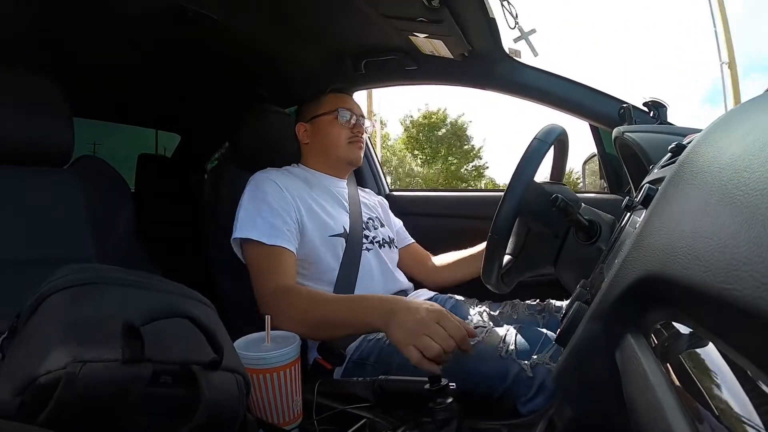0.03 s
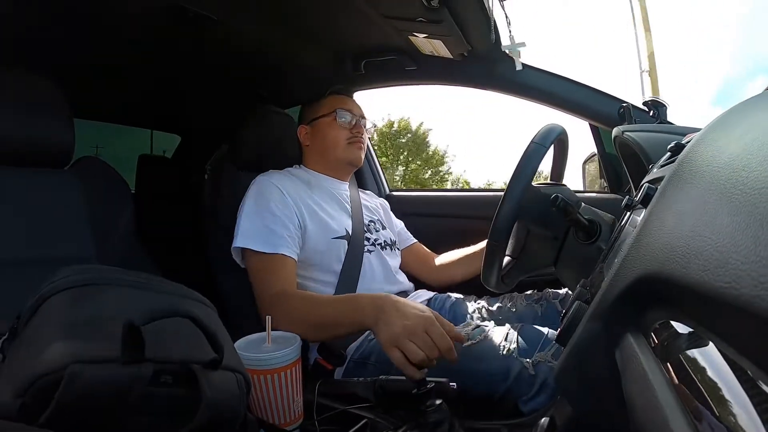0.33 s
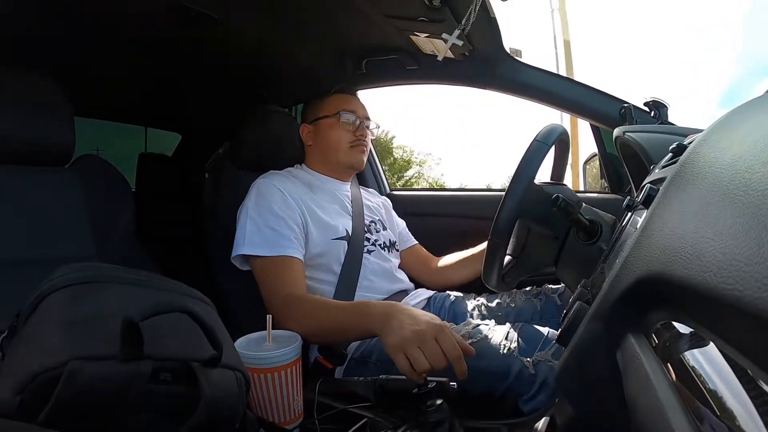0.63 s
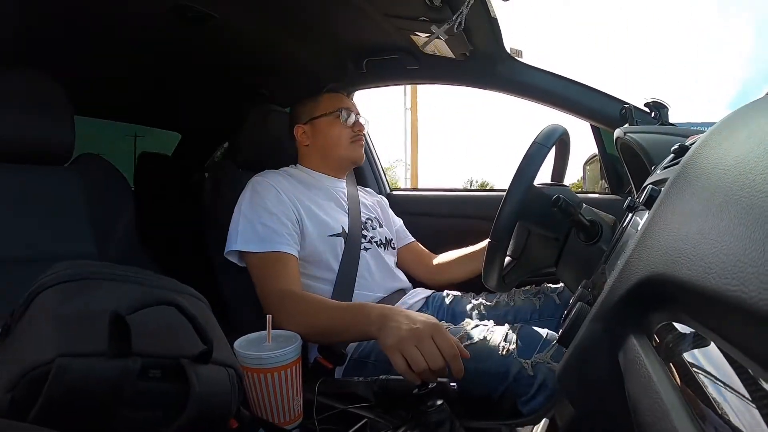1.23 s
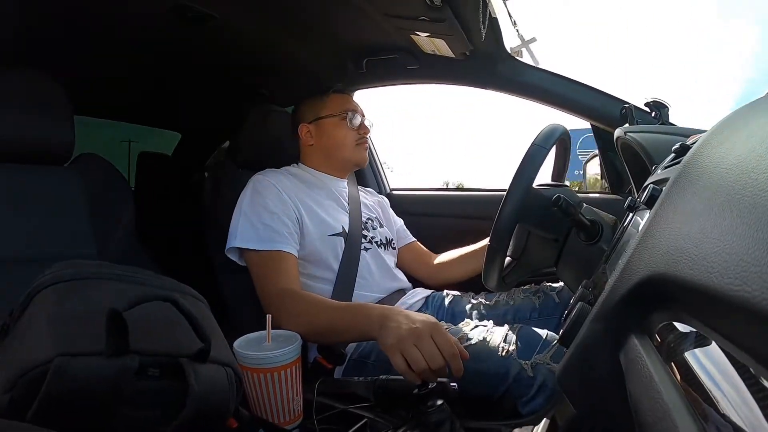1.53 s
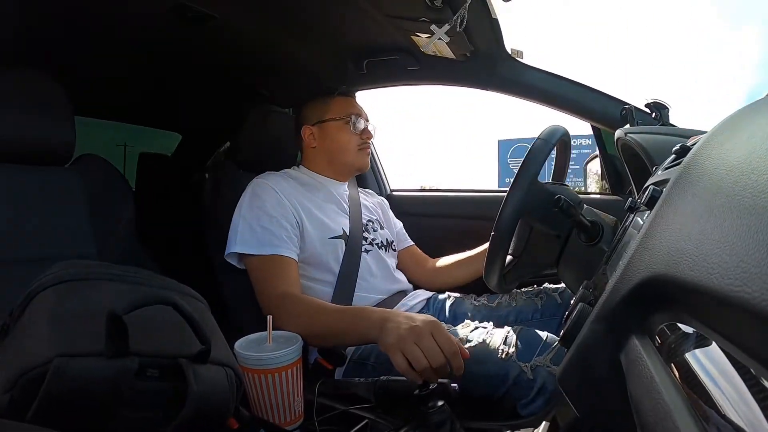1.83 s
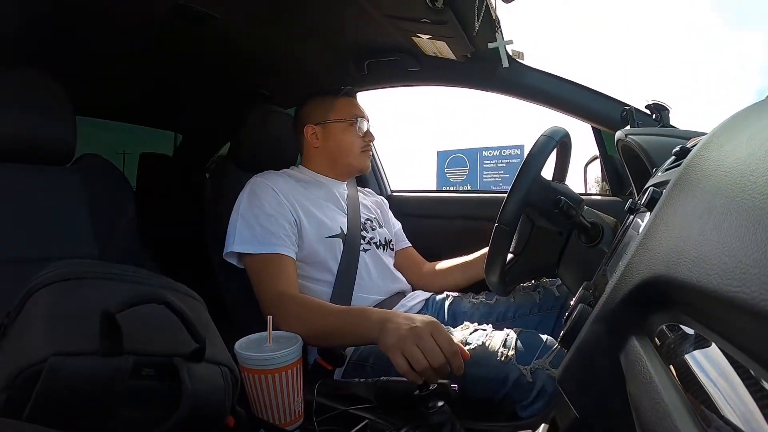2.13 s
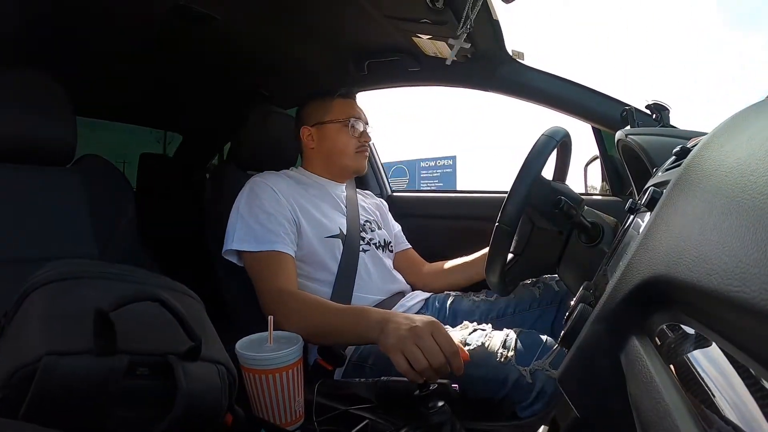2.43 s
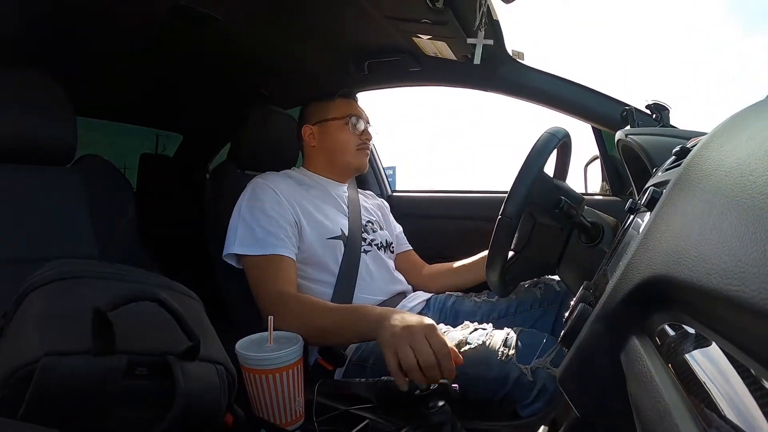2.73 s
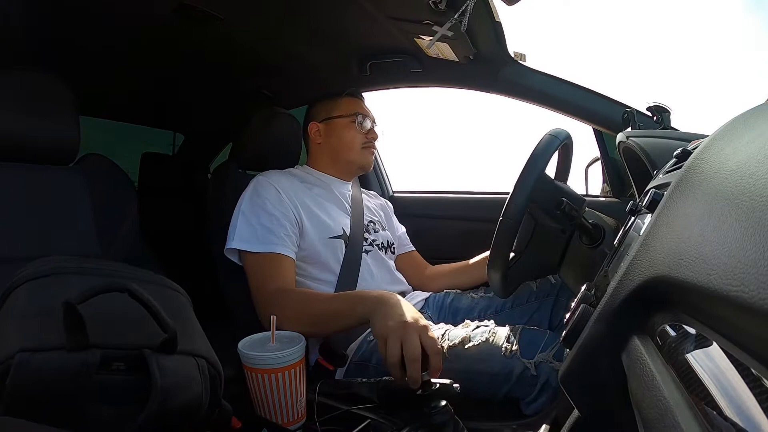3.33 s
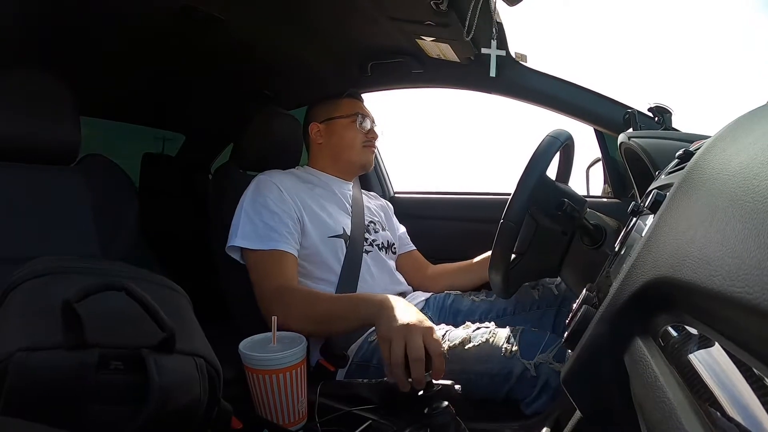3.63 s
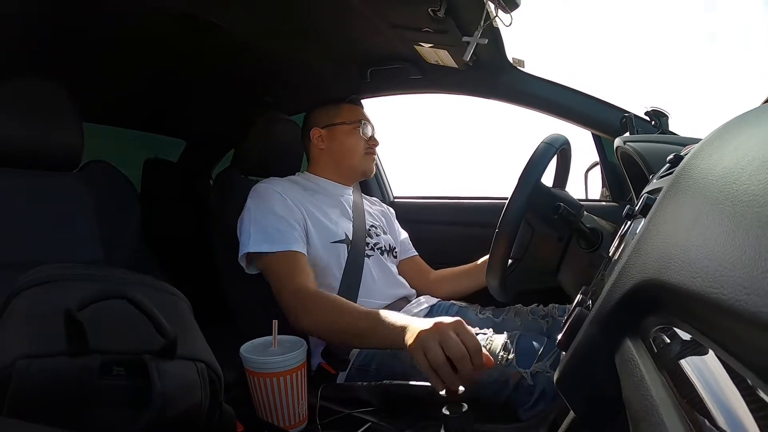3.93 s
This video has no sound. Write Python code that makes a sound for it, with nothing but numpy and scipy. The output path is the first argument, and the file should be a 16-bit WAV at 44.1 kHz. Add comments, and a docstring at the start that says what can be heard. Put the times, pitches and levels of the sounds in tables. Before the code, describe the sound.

A turbocharged car engine drones deeply, heard from inside the cabin. A dull clunk comes at about 0.3 seconds as the throttle opens. The revs sag until 1.3 seconds, then climb steadily, growing louder. Around 3.8 seconds the revs drop and the turbo releases two short airy puffs. Road rumble and rushing air run underneath, with faint trim ticks and tiny squeaks just after 3 seconds.

```python
"""A turbocharged four-cylinder engine, heard from inside the moving car. The throttle opens with a
driveline clunk, the revs sag as the clutch bites, then climb steadily while the exhaust booms and its
harmonics sweep through the cabin's resonances. At the end the throttle shuts and the turbo lets off
its pressure in two short puffs. Underneath, the road rumbles, wind and intake air rush, and loose
trim ticks and squeaks."""
import sys
import numpy as np
from scipy import signal
from scipy.io import wavfile

SR = 44100
rng = np.random.default_rng(int(sys.argv[2]) if len(sys.argv) > 2 else 0)


def persist_wave(psi):
    """Save psi, clipped to +-1, as 16-bit WAV."""
    counts = np.round(np.clip(psi, -1, 1) * 32767).astype(np.int16)
    wavfile.write(sys.argv[1], SR, np.atleast_2d(counts).T)


N = 176400
TIME = np.arange(N) / SR


# Exhaust drone at the firing rate: time_s, level_db
DRONE_LEVEL = [(0, -63), (0.06, -28.5), (0.12, -15), (0.22, -16), (0.32, -20), (0.39, -27.5), (0.48, -21),
               (0.85, -19.5), (0.98, -17.5), (1.1, -19.5), (1.5, -18.5), (1.8, -17.5), (2.08, -15.5),
               (2.35, -17), (2.8, -19), (3.2, -16), (3.75, -13), (3.9, -16), (4, -27)]
# Exhaust boom an octave above it: time_s, level_db
BOOM_LEVEL = [(0, -54.5), (0.2, -66), (0.325, -47), (0.342, -17), (0.48, -22), (0.58, -10), (0.68, -12.5),
              (0.88, -13.5), (1.03, -32.5), (1.15, -25.5), (1.6, -23), (1.9, -32.5), (2.25, -31.5),
              (2.47, -20), (2.62, -22.5), (2.78, -13), (3.05, -15.5), (3.35, -16.5), (3.46, -23.5),
              (3.68, -24), (3.8, -36), (3.92, -20), (4, -38)]
LOW_PAN_DB = 0.9

def exhaust(phase):
    """The firing pulses' two lowest harmonics fill the cabin, nearly pure."""
    drone = from_db(in_time(DRONE_LEVEL)) * partial(phase, roughness=0.075)
    boom = from_db(in_time(BOOM_LEVEL)) * partial(2 * phase, roughness=0.075)
    return pan(LOW_PAN_DB) * (drone + boom)


# Swells of harmonics 3 to 8 as they cross cabin resonances: time_s, level_db
HARMONIC_3 = [(0.0, -57), (0.36, -41.5), (1.0, -53), (1.24, -38), (2.12, -47), (2.6, -44), (3.44, -49),
              (3.76, -29.5), (4.0, -54)]
HARMONIC_4 = [(0.0, -49.5), (0.84, -43.5), (0.921, -39), (1.08, -55), (1.28, -40), (1.52, -47.5),
              (2.68, -32), (2.76, -40.5), (3.24, -33), (3.56, -38.5), (3.8, -45), (3.88, -38), (4.0, -59)]
HARMONIC_5 = [(0.0, -69.5), (0.6, -43.5), (1.081, -45.5), (1.279, -37.5), (1.759, -56.5), (1.88, -41.5),
              (2.44, -46), (2.88, -50.5), (2.999, -33), (3.721, -35.5), (3.8, -26.5), (4.0, -76)]
HARMONIC_6 = [(0.0, -76.5), (0.919, -45.5), (1.44, -39), (1.639, -46), (1.84, -36), (2.08, -34.5),
              (2.24, -45), (2.56, -32), (2.88, -46.5), (2.959, -34), (3.6, -41), (3.761, -46.5),
              (3.92, -42), (4.0, -62)]
HARMONIC_7 = [(0.0, -74.5), (.9, -49), (1.04, -34.5), (1.15, -47.5), (1.5, -37.5), (1.64, -42.5),
              (2.201, -33.5), (2.48, -48), (2.84, -45.5), (3.521, -61.5), (3.84, -56), (4.0, -70)]
HARMONIC_8 = [(0, -78.5), (0.901, -58.5), (1.1, -48), (1.25, -41.5), (1.5, -40), (1.7, -47), (2.099, -48),
              (2.5, -59.5), (4, -66.5)]
MID_PAN_DB, PAN_WANDER_DB = 3.5, 2

def engine_harmonics(phase):
    """The engine's clean midrange: each harmonic swells in turn and wanders a little in the stereo image."""
    levels = (HARMONIC_3, HARMONIC_4, HARMONIC_5, HARMONIC_6, HARMONIC_7, HARMONIC_8)
    out = 0
    for k, level in enumerate(levels, 3):
        tone = from_db(in_time(level)) * partial(k * phase, roughness=0.24)
        out = out + tone * pan(MID_PAN_DB + PAN_WANDER_DB * drift(rate_hz=1.1))
    return out


# Engine load, riding the growl's fader: time_s, gain_db
ENGINE_LOAD = [(0, -31), (.45, -18.5), (.62, -3.5), (.85, -8.5), (1, 2), (1.3, -4), (1.7, 1.5),
               (2.15, -4.5), (2.3, 0), (2.55, 1), (2.8, -7), (3.05, -1.5), (3.5, 5), (3.81, 1.5),
               (3.9, -11), (4, -20)]
# Tone shaping by exhaust and cabin: frequency_hz, gain_db
BODY_RESPONSE = [(200, -28), (265, -41.5), (310, -51.5), (370, -54.5), (430, -36), (470, -44.5),
                 (500, -37.5), (555, -35), (600, -37), (715, -40), (790, -43.5), (900, -61), (1030, -47),
                 (1300, -59), (2000, -70.5)]
UNEVEN_DB, HALF_ORDER_BOOST_DB, UPPER_DB = -14.5, 6.5, -6.5

def engine_growl(firing_hz, phase):
    """Unequal cylinders add rough partials between the harmonics; the body colours these and the top."""
    def voice(k, gain_db, roughness):
        return from_db(gain_db + at_hz(BODY_RESPONSE, k * firing_hz)) * partial(k * phase, roughness)

    # Four firings make one cycle, so the uneven partials fall on quarters of the firing rate.
    uneven = sum(voice(k, UNEVEN_DB + (HALF_ORDER_BOOST_DB if k % 1 == 0.5 else 0), roughness=0.46)
                 for k in np.arange(2.25, 9, 0.25) if k % 1)
    upper = sum(voice(k, UPPER_DB, roughness=0.37) for k in range(9, 17))
    return (uneven + upper) * from_db(in_time(ENGINE_LOAD)) * pan(MID_PAN_DB)


# Driveline knocks as the throttle opens and shuts: peak_s, level_db, attack_s, decay_s
CLUNK_HITS = [(.334, -25, 0.003, 0.021), (.357, -32.5, .003, 0.0098), (0.403, -35, .008, .02),
              (3.876, -32, 0.0035, 0.034)]
# Dull colour of each knock: frequency_hz, density_db
CLUNK_COLOUR = [(80, -8), (220, -2), (330, 1.5), (480, 1), (680, -8.5), (900, -18.5), (1300, -20.5),
                (2300, -33), (3200, -52.5), (5000, -61), (12000, -82.5)]
# Ring of the car body after a knock: pitch_hz, gain_db, t60_s
BODY_MODES = [(198, -11.5, 0.18), (335, -28.5, 0.044), (488, -30.5, 0.094), (688, -30.5, 0.088),
              (1000, -34, 0.05), (1250, -40.5, 0.045)]
RING_DRIVE_DB, MOUNT_CUTOFF_HZ = 23, 2100

def driveline_clunk(bands):
    """The driveline takes up its slack: each contact gives a noisy knock and sets the body ringing."""
    contacts = np.zeros(N) + 1e-18
    for peak_s, level_db, _, _ in CLUNK_HITS:
        contacts[int(peak_s * SR)] = from_db(level_db + RING_DRIVE_DB)
    rubber_mounts = signal.butter(2, MOUNT_CUTOFF_HZ, fs=SR, output="sos")
    softened = signal.sosfilt(rubber_mounts, contacts)
    ring = 0
    for pitch_hz, gain_db, t60_s in BODY_MODES:
        radius, angle = from_db(-60 / (t60_s * SR)), 2 * np.pi * pitch_hz / SR
        poles = [1, -2 * radius * np.cos(angle), radius ** 2]
        ring = ring + from_db(gain_db) * signal.lfilter([0, np.sin(angle)], poles, softened)
    return ring * pan(LOW_PAN_DB) + bursts(CLUNK_HITS) * coloured(bands, CLUNK_COLOUR)


# Brief sizzle under boost: peak_s, level_db, attack_s, decay_s
BOOST_SIZZLE = [(3.11, -55, 0.068, 0.042)]
# Its thin, high colour: frequency_hz, density_db
SIZZLE_COLOUR = [(2500, -29.5), (4000, -17), (4700, 1.5), (5500, -3.5), (6300, -13.5), (12000, -36)]
# Pressure release, the first two bursts merging into one puff: peak_s, level_db, attack_s, decay_s
RELEASE_PUFFS = [(3.856, -33, 0.013, 0.013), (3.871, -39, .005, 0.015), (3.949, -37, 0.021, 0.02)]
# Airy colour of the puffs: frequency_hz, density_db
PUFF_COLOUR = [(400, -14), (900, -4), (1600, 9), (2200, 2.5), (3800, 2.5), (5000, -12), (7000, -11.5),
               (9000, -28), (14000, -58)]
# Ring of the intake pipe: pitch_hz, width_hz, gain
PIPE_RESONANCES = [(1610, 45, .9), (2420, 74, 0.79), (2550, 61, 1.8), (2700, 57, 1.8), (3260, 280, 0.82),
                   (3860, 86, 2.1), (4350, 55, 1.1), (5600, 150, 1.2)]

def turbo_air(bands):
    """The turbo sizzles under boost, then its release puffs ring in the intake pipe."""
    sizzle = bursts(BOOST_SIZZLE) * coloured(bands, SIZZLE_COLOUR)
    pipe_air = unit_rms(resonate(coloured(bands, PUFF_COLOUR), PIPE_RESONANCES))
    return sizzle + bursts(RELEASE_PUFFS) * pipe_air


# Turbo spinning down before the throttle opens: time_s, pitch_hz, level_db
WHINE_GLIDE = [(0, 1370, -54), (0.11, 1282, -44), (0.168, 1221, -59.5), (.27, 1120, -46), (.32, 1061, -60),
               (.5, 987, -80.5)]

def turbo_whine():
    """A breathy, fluttering band of air noise falls in pitch as the turbo slows."""
    time_s, pitch_hz, level_db = np.transpose(WHINE_GLIDE)
    flutter = 1 + 0.44 * drift(rate_hz=19)
    breath = narrow_noise(np.interp(TIME, time_s, pitch_hz), width_hz=42)
    return from_db(np.interp(TIME, time_s, level_db)) * unit_rms(flutter * breath)


# Sub-bass body shake and road rumble, their colours: frequency_hz, density_db
SHAKE_COLOUR = [(12, -15.5), (22, -9), (31, -2), (41, 0.5), (50, -2.5), (62, -13.5), (90, -27.5),
                (150, -55)]
RUMBLE_COLOUR = [(45, -16.5), (62, -4.5), (80, -1.5), (110, -0.5), (150, -11.5), (190, -12), (235, -9.5),
                 (300, -23), (450, -39), (900, -83.5)]
# Their fader moves: time_s, level_db
SHAKE_FADER = [(0, -20.5), (.35, -21), (.75, -26), (1.2, -22.5), (1.7, -22.5), (2.15, -27), (2.6, -20),
               (3.2, -30), (3.7, -31), (4, -26)]
RUMBLE_FADER = [(0, -23), (.4, -23.5), (.7, -27.5), (1.1, -23.5), (1.7, -23.5), (2.1, -24.5), (2.6, -25),
                (3.2, -27.5), (3.75, -21), (4, -18.5)]

def road(bands):
    """The road rumbles through the car and shakes the body on its springs."""
    shake = from_db(in_time(SHAKE_FADER)) * coloured(bands, SHAKE_COLOUR)
    rumble = from_db(in_time(RUMBLE_FADER)) * coloured(bands, RUMBLE_COLOUR)
    return shake + rumble


# Midrange rush and bright air hiss, their colours: frequency_hz, density_db
RUSH_COLOUR = [(150, -4), (300, 0.5), (420, 1.5), (680, -3), (870, -12.5), (1050, -6), (1300, -13),
               (1600, -16.5), (2000, -23), (2600, -32), (3300, -41.5), (6000, -49), (14000, -77.5)]
HISS_COLOUR = [(1000, -8), (2000, 0), (2800, -1.5), (3800, 0), (5000, -7.5), (6500, -11.5), (8000, -16),
               (10000, -30), (14000, -55.5)]
# Their fader moves: time_s, level_db
RUSH_FADER = [(0, -39), (.28, -39.5), (.4, -38.5), (.55, -43), (.8, -40), (1.05, -40), (1.7, -38),
              (2.3, -35.5), (2.8, -36), (3.3, -32.5), (3.75, -32.5), (3.88, -25.5), (4, -33.5)]
HISS_FADER = [(0, -55.5), (.15, -59.5), (.5, -61), (.65, -65), (.9, -58.5), (1.4, -60), (2.3, -55.5),
              (2.85, -56), (3.1, -53.5), (3.35, -54), (3.5, -57), (3.77, -56), (3.79, -48.5), (4, -53)]
# Narrow rings of glass and trim: pitch_hz, width_hz, gain
PANEL_RESONANCES = [(1060, 41, 0.17), (1542, 34, 1.1), (3500, 95, 0.22), (3805, 72, 0.51), (4600, 83, 0.37),
                    (5000, 70, 1.4), (5600, 69, 0.3)]
RUSH_THROB, HISS_THROB = 0.18, 0.065

def air_rush(bands, phase):
    """Wind, tyres and intake make a rush and hiss that throb with the firings and ring in the panels."""
    rush = from_db(in_time(RUSH_FADER)) * coloured(noise_bands(), RUSH_COLOUR)
    hiss = from_db(in_time(HISS_FADER)) * coloured(bands, HISS_COLOUR)
    throb = np.sin(phase)
    return resonate(rush * (1 + RUSH_THROB * throb) + hiss * (1 + HISS_THROB * throb), PANEL_RESONANCES)


# Dry trim ticks and soft cabin rustles: peak_s, level_db, attack_s, decay_s
TRIM_TICKS = [(.742, -58.5, .002, 0.0059), (.877, -57, .004, .01), (1.108, -65.5, 0.0036, 0.0073),
              (1.383, -56, .001, 0.0027), (1.547, -52.5, .002, 0.0053), (1.76, -66.5, .002, 0.0055),
              (2.09, -62, .001, 0.0048), (2.141, -47, 0.0017, 0.0046), (2.215, -65, .004, .006),
              (2.32, -67, .001, 0.0055), (2.813, -67, .001, 0.0046), (3.164, -54, .001, 0.0059),
              (3.358, -50, .001, .005)]
CABIN_RUSTLES = [(.02, -62, .02, 0.016), (.19, -68.5, .035, 0.033), (.495, -65.5, .03, 0.038),
                 (1.11, -71, .012, .015), (1.52, -74, .03, .03)]
# Their crisp colours: frequency_hz, density_db
TICK_COLOUR = [(800, -6.5), (2000, -5.5), (4000, -4.5), (6000, -4), (8500, -15), (14000, -30)]
RUSTLE_COLOUR = [(2500, -11), (4500, 2.5), (7000, -3), (9000, -4.5), (12000, -10.5), (14000, -24)]
# Thin squeaks: peak_s, pitch_hz, level_db, attack_s, decay_s
TRIM_SQUEAKS = [(3.078, 3850, -55, 0.036, .017), (3.11, 5400, -65, .04, .03),
                (3.12, 5570, -59.5, 0.031, .014), (3.14, 4600, -58, .06, .011),
                (3.267, 3850, -56, .004, .008), (3.297, 3850, -61, 0.019, .018)]
CHATTER_PER_S, CHATTER_MIN_DB, CHATTER_SPREAD_DB, CHATTER_DECAY_S = 9, -76, 5, 0.0044

def loose_trim(bands):
    """Loose trim ticks, chatters faintly at random, rustles and squeaks."""
    touches = rng.random(N) < CHATTER_PER_S / SR
    strength = from_db(CHATTER_MIN_DB + CHATTER_SPREAD_DB * np.minimum(rng.exponential(1, N), 3))
    chatter = signal.lfilter([1], [1, -np.exp(-1 / (CHATTER_DECAY_S * SR))], touches * strength + 1e-18)
    ticks = (bursts(TRIM_TICKS) + chatter) * coloured(bands, TICK_COLOUR)
    rustles = bursts(CABIN_RUSTLES) * coloured(bands, RUSTLE_COLOUR)
    squeaks = 0
    for peak_s, pitch_hz, level_db, attack_s, decay_s in TRIM_SQUEAKS:
        stereo_tone = np.array([narrow_noise(pitch_hz, width_hz=55) for _ in range(2)])
        squeaks = squeaks + bursts([(peak_s, level_db, attack_s, decay_s)]) * stereo_tone
    return ticks + rustles + squeaks


# Stereo image of the noise, mono (1 and above) in the bass and wide on top: frequency_hz, likeness
STEREO_LIKENESS = [(100, 1.52), (250, 1.2), (500, 1.2), (1000, 0.5), (2000, 0.52), (4000, 0.1),
                   (8000, -0.35)]
# Its lean to the left: frequency_hz, left_minus_right_db
STEREO_BALANCE = [(30, 2.9), (120, 1.4), (300, 2.5), (600, 7.9), (1100, 2), (2200, 4.7), (4000, 1.7),
                  (8000, 0.81)]
FLICKER_DB = 1.62

def noise_bands():
    """Third-octave bands of stereo noise, each with its own flicker, width and pan: (centre_hz, band)."""
    edges_hz = 14 * 2 ** (np.arange(31) / 3)
    white, bands = rng.standard_normal((2, 2, N + SR // 2)), []
    for k, (low_hz, high_hz) in enumerate(zip(edges_hz, edges_hz[1:])):
        bandpass = signal.butter(3, [low_hz, high_hz], "band", fs=SR, output="sos")
        mid, side = signal.sosfilt(bandpass, white[k % 2])[:, -N:]
        centre_hz = np.sqrt(low_hz * high_hz)
        likeness = np.clip(at_hz(STEREO_LIKENESS, centre_hz), -1, 0.999)
        pair = np.sqrt(1 + likeness) * mid + np.sqrt(1 - likeness) * side * [[1], [-1]]
        flicker = from_db(FLICKER_DB * drift(rate_hz=14))
        bands.append((centre_hz, pair * pan(at_hz(STEREO_BALANCE, centre_hz)) * flicker))
    return bands


def coloured(bands, colour):
    """Mix the bands to a colour curve, reaching up to an octave past its ends; rms 1."""
    low_hz, high_hz = colour[0][0] / 2, colour[-1][0] * 2
    return unit_rms(sum(from_db(at_hz(colour, hz)) * band for hz, band in bands if low_hz < hz < high_hz))


def partial(phase, roughness, waver_hz=9.7):
    """One engine partial, wavering in strength and phase; rms about 1."""
    phase = phase + rng.uniform(0, 2 * np.pi)
    tone = (1 + roughness * drift(waver_hz)) * np.sin(phase)
    jitter = roughness * drift(waver_hz) * np.cos(phase)
    return np.sqrt(2 / (1 + 2 * roughness ** 2)) * (tone + jitter)


def narrow_noise(pitch_hz, width_hz):
    """An unsteady tone around a held or gliding pitch; rms 1."""
    phase = 2 * np.pi * np.cumsum(pitch_hz * np.ones(N)) / SR
    return unit_rms(drift(width_hz) * np.sin(phase) + drift(width_hz) * np.cos(phase))


def resonate(x, resonances):
    """Add the ringing of a few narrow resonances."""
    return x + sum(gain * signal.lfilter(*signal.iirpeak(hz, hz / width_hz, fs=SR), x)
                   for hz, width_hz, gain in resonances)


def bursts(events):
    """Envelope of events that swell to a peak and die away, summed in power."""
    power = 0
    for peak_s, level_db, attack_s, decay_s in events:
        shape = np.exp(-np.maximum((peak_s - TIME) / attack_s, (TIME - peak_s) / decay_s))
        power = power + (from_db(level_db) * shape) ** 2
    return np.sqrt(power)


def drift(rate_hz):
    """Smooth random modulation, mostly slower than rate_hz; rms about 1."""
    hop, settle = 40, 2000
    pole = np.exp(-2 * np.pi * hop * rate_hz / SR)
    white = rng.standard_normal(N // hop + settle + 2)
    slow = signal.lfilter([1], [1, -2 * pole, pole * pole], white)[settle:]
    return np.interp(np.arange(N) / hop, np.arange(len(slow)), unit_rms(slow))


def in_time(curve):
    """Read a time curve at every sample."""
    return np.interp(TIME, *np.transpose(curve))


def at_hz(curve, hz):
    """Read a curve on a log-frequency axis."""
    frequency_hz, value = np.transpose(curve)
    return np.interp(np.log(hz), np.log(frequency_hz), value)


def pan(left_minus_right_db):
    """Left and right gains for a level difference."""
    return from_db(np.array([[0.5], [-0.5]]) * left_minus_right_db)


def from_db(db):
    """Decibels to gain."""
    return 10 ** (np.asarray(db) / 20)


def unit_rms(x):
    """Scale to rms 1."""
    return x / np.sqrt(np.mean(x ** 2) + 1e-20)


# The revs, sagging, climbing and dropping at the end: time_s, firing_hz
ENGINE_REVS = [(0.0, 130.0), (0.07, 123.0), (0.2, 119.8), (0.3, 113.2), (0.4, 107.8), (0.5, 106.6),
               (0.62, 110.7), (0.8, 115.9), (0.9, 111.9), (1.0, 102.6), (1.1, 94.7), (1.2, 88.1),
               (1.28, 85.4), (1.39, 90.6), (1.5, 90.5), (1.75, 94.7), (2.0, 99.7), (2.5, 108.9),
               (2.9, 116.2), (3.3, 125.7), (3.6, 134.4), (3.82, 142.1), (3.91, 134.6), (4.0, 122.0)]

def scene():
    """The full mix: the revs drive the engine's tones and the throb of the air."""
    firing_hz = in_time(ENGINE_REVS)
    phase = 2 * np.pi * np.cumsum(firing_hz) / SR
    event_bands = noise_bands()
    engine = exhaust(phase) + engine_harmonics(phase) + engine_growl(firing_hz, phase)
    bed_bands = noise_bands()
    bed = road(bed_bands) + air_rush(bed_bands, phase)
    turbo = turbo_whine() + turbo_air(event_bands)
    return engine + driveline_clunk(event_bands) + turbo + bed + loose_trim(event_bands)


def record(dry):
    """A steep low-pass takes off the very top, 70 dB down from 14.4 kHz."""
    return signal.sosfilt(signal.cheby2(12, 70, 14400, fs=SR, output="sos"), dry)


dry = scene()
out = record(dry)
persist_wave(out)
```